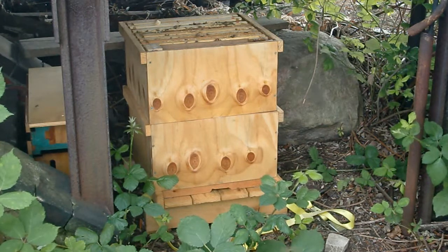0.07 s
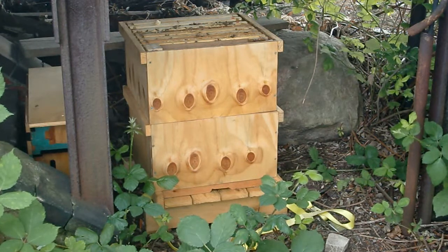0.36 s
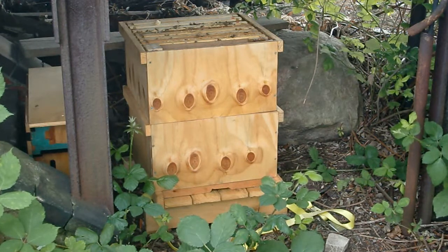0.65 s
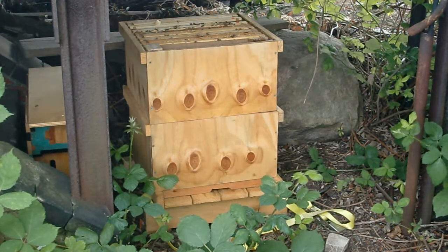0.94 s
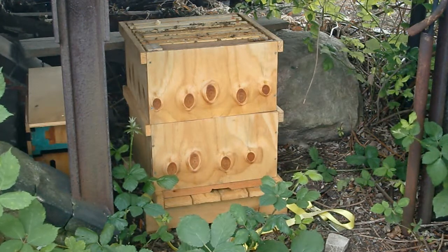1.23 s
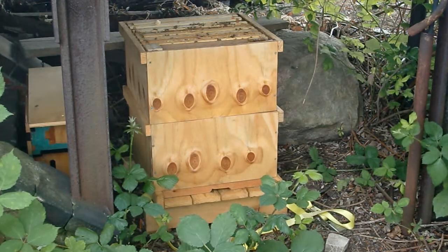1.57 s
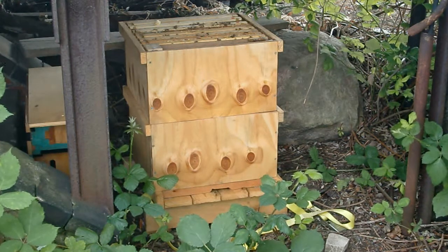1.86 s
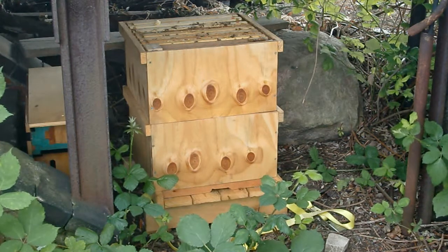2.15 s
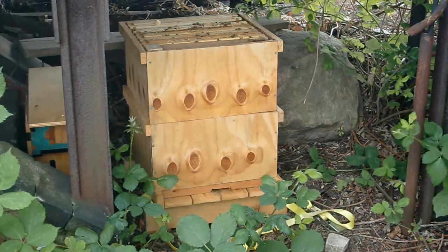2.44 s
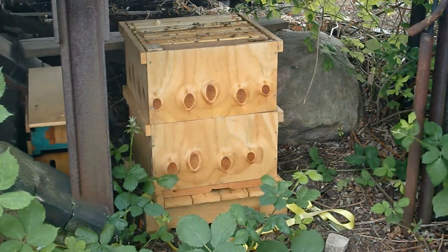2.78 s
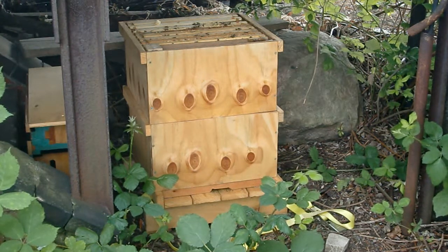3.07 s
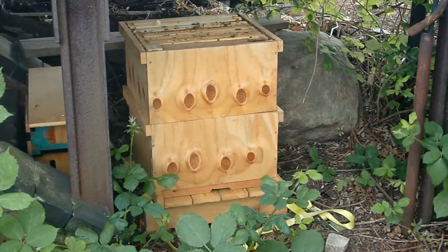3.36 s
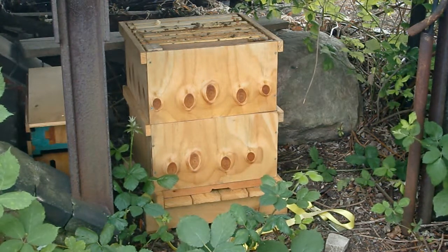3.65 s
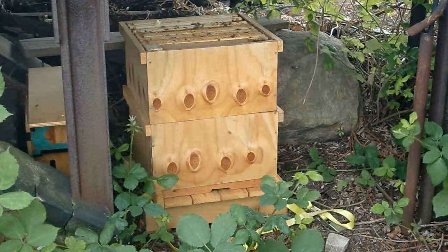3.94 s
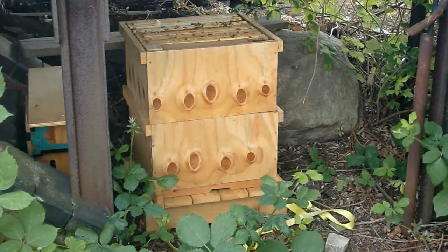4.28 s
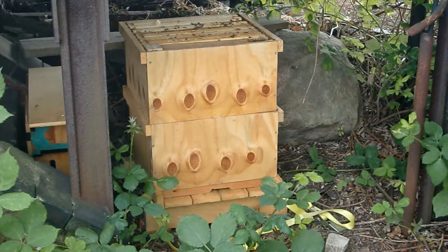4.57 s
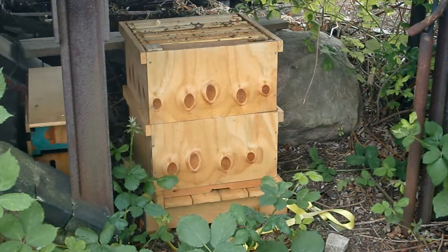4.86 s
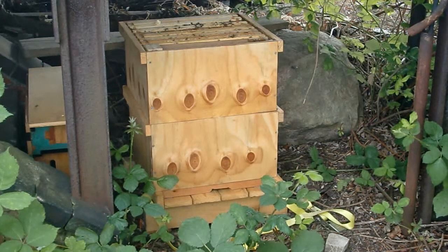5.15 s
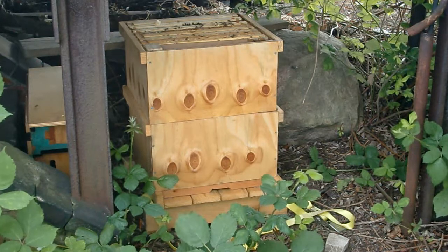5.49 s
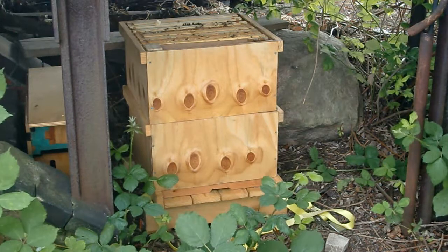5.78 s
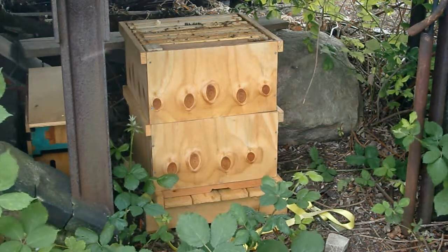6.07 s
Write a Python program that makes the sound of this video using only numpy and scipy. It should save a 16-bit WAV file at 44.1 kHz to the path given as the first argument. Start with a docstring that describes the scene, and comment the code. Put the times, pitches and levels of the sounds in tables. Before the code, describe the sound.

A soft, steady outdoor hiss runs for the whole six seconds beside a beehive, with a low rumble and the faint, wavering drone of distant machinery underneath. Nothing else happens until just before 4 seconds, when a bee's low buzz swells quickly, right up to the microphone. At about 4 seconds the bee hits the camera body with one short, sharp, slightly ringing knock, by far the loudest sound. The hiss ducks for an instant and swells back. At about 4.2 seconds the bee grazes the camera with a much softer, duller tap; its buzz lifts slightly in pitch, then vanishes by about 4.4 seconds as it speeds off. A faint low hum peaks around then and slowly tails away, while the hiss and rumble carry on unchanged to the end.

```python
"""Beside a beehive, a camera stands in a bed of outdoor hiss, low rumble and far machinery drone.
One bee flies in, its wingbeats buzzing, hits the camera body with a sharp, ringing knock,
grazes it once more and speeds off. The knock slams a limiter, so the hiss ducks and swells back.
A faint low hum rises just after the knock and tails away."""
import sys
import numpy as np
from scipy import signal
from scipy.fft import rfft, irfft, next_fast_len
from scipy.io import wavfile
from scipy.ndimage import uniform_filter1d, minimum_filter1d, map_coordinates

SR = 44100
rng = np.random.default_rng(int(sys.argv[2]) if len(sys.argv) > 2 else 0)


def int16_out(signal):
    """Quantize to a 16-bit WAV file."""
    q = np.round(np.clip(np.atleast_2d(signal).T, -1, 1) * 32767)
    wavfile.write(sys.argv[1], SR, q.astype(np.int16))


N = 274302

# colour of the open-air hiss: (frequency [Hz], relative level [dB])
HISS_SPECTRUM = [(59, -41), (100, 0), (447, -2.5), (552, -3.5), (4190, -11.5), (7100, -17), (7730, -21),
                 (8950, -23.5), (15500, -40)]
# colour of the distant rumble: (frequency [Hz], relative level [dB])
RUMBLE_SPECTRUM = [(8, -20), (20, -8), (38, -6), (51, 2.5), (61, -4), (80, -1), (100, -23), (140, -25),
                   (400, -120)]
# harmonics of the buzz: (multiple of the wingbeat [-], relative level [dB])
WING_HARMONICS = [(1, 1.5), (2, -2), (3, -31), (4, -9), (5, -31), (6, -39), (7, -18)]
# the bee's hits on the camera: (time [s], gain [dB], low-pass cutoff [Hz])
CONTACTS = [(4.036, 13, 14500), (4.169, -28.5, 2100)]
# ringing modes of the camera body: (frequency [Hz], relative level [dB], time to fall 60 dB [s])
CAMERA_MODES = [(162, -13.5, 0.017), (267, -6, 0.022), (346, -10, 0.046), (490, -15, 0.071),
                (590, -15.5, 0.046), (773, -6, 0.028), (1110, -16.5, 0.03), (1293, -24.5, 0.037),
                (1555, -15.5, 0.024), (1945, -7.5, 0.01), (2340, -22, 0.012), (2490, -5.5, 0.012),
                (2830, -4, 0.0092), (3230, -5.5, 0.01), (3990, -10, 0.0093), (4700, -14.5, 0.0057),
                (6350, -18, 0.0086), (7170, -13.5, 0.0033), (13100, -26, 0.0015), (3300, -61, 0.18)]

HISS_DB, RUMBLE_DB, DRONE_DB, BUZZ_DB, TAIL_DB = -52.5, -60.5, -62, -42, -61.5  # layer faders
CLOSE_M, APPROACH_M_PER_S, ESCAPE_M_PER_S2 = 0.026, 0.98, 5.3
# wingbeat: an easy hover, and one surge of effort to get clear after the knock
HOVER_HZ, SURGE_HZ, SURGE_PEAK_S, SURGE_WIDTH_S = 186.4, 16.87, 4.168, 0.0764


def amp(db):
    """Decibels to gain."""
    return 10 ** (np.asarray(db) / 20)


def unit(x):
    """Scale to rms 1."""
    return x / np.sqrt(np.mean(x ** 2) + 1e-20)


def wobble(rate):
    """A smooth random modulator, rate knots a second."""
    knots = rng.standard_normal(int(N * rate / SR) + 4)
    return map_coordinates(knots, [np.arange(N) * rate / SR])


def filtered(x, response):
    """EQ x with a gain curve given as a function of frequency."""
    size = next_fast_len(N + SR // 2)
    return irfft(rfft(x, size) * response(np.fft.rfftfreq(size, 1 / SR)), size)[:N]


def noise(spectrum):
    """Noise of rms 1, coloured by (frequency [Hz], level [dB]) points on a log axis."""
    points_hz, db = np.transpose(spectrum)
    colour = lambda hz: amp(np.interp(np.log(hz + 1), np.log(points_hz + 1), db))
    return unit(filtered(rng.standard_normal(N), colour))


def hum(centre_hz, drift, flutter_db):
    """A sine of rms 1 with wandering pitch and optional level flutter."""
    pitch_hz = centre_hz * (1 + drift * wobble(9))
    return unit(amp(flutter_db * wobble(6.7)) * np.sin(2 * np.pi * np.cumsum(pitch_hz) / SR))


def open_air():
    """The ambience bed: even hiss with a narrow treble notch, over a low rumble."""
    notch = lambda hz: amp(-10 * np.exp(-((hz - 7740) / 90) ** 2))
    hiss = amp(HISS_DB + 0.096 * wobble(3.2)) * filtered(noise(HISS_SPECTRUM), notch)
    rumble = amp(RUMBLE_DB + 0.64 * wobble(2.4)) * noise(RUMBLE_SPECTRUM)
    return hiss + rumble


def machinery():
    """Far machinery drones on one low, wavering note."""
    return amp(DRONE_DB) * hum(centre_hz=69, drift=0.0254, flutter_db=2.7)


def bee():
    """Wingbeats make a buzz and puffs of air; effort lifts the pitch, distance rides the level."""
    t = np.arange(N) / SR
    effort = np.exp(-((t - SURGE_PEAK_S) / SURGE_WIDTH_S) ** 2)
    beat_hz = (HOVER_HZ + SURGE_HZ * effort) * (1 + 0.01087 * wobble(90))
    phase = 2 * np.pi * np.cumsum(beat_hz) / SR
    buzz = sum(amp(db + 2.3 * wobble(49)) * np.sin(k * phase) for k, db in WING_HARMONICS)
    stirred_air = noise([(60, -23), (200, -1), (550, -4), (1200, -13), (5000, -48)])
    puffs = amp(-11.5) * (1 + np.cos(phase)) * stirred_air
    # it flies in at a steady speed, stays close between the hits, then accelerates away
    until_hit_s = np.maximum(CONTACTS[0][0] - t, 0)
    since_graze_s = np.maximum(t - CONTACTS[-1][0], 0)
    distance_m = CLOSE_M + APPROACH_M_PER_S * until_hit_s + .5 * ESCAPE_M_PER_S2 * since_graze_s ** 2
    # this near the wings, pressure falls with the square of the distance
    return amp(BUZZ_DB) * (CLOSE_M / distance_m) ** 2 * (buzz + puffs)


def camera_knocks():
    """Each hit gives a tiny crack and rings the camera body, right at the microphone."""
    track = np.zeros(N + SR)
    t = np.arange(SR // 4) / SR
    # neighbouring modes swing opposite ways at the microphone
    ring = sum((-1) ** k * amp(db - 60 * t / t60) * np.sin(2 * np.pi * hz * t)
               for k, (hz, db, t60) in enumerate(CAMERA_MODES))
    for start_s, db, cutoff_hz in CONTACTS:
        crack = amp(-25.0 - 60 * t / 0.013) * rng.standard_normal(len(t))
        # a gentle contact lasts longer and so sounds duller
        lowpass = signal.butter(2, min(cutoff_hz, SR / 3), fs=SR)
        track[round(start_s * SR):][:len(t)] += amp(db) * signal.lfilter(*lowpass, ring + crack)
    return track[:N]


def tail_hum(peak_s=4.36, rise_db_per_s=44, fall_db_per_s=12):
    """A faint low hum swells to a peak just after the knock and fades slowly."""
    t = np.arange(N) / SR - peak_s
    swell = amp(-np.abs(t) * np.where(t < 0, rise_db_per_s, fall_db_per_s))
    return amp(TAIL_DB) * swell * hum(centre_hz=117, drift=0.0173, flutter_db=0.0)


def limiter(x, ceiling_db, release_s):
    """The gain ducks just ahead of a peak over the ceiling, then eases back."""
    over_db = np.maximum(20 * np.log10(np.abs(x) + 1e-9) - ceiling_db, 1e-9)
    release = np.arange(N) / SR / release_s
    # each peak sets a gain cut that then shrinks exponentially
    cut_db = np.exp(np.maximum.accumulate(np.log(over_db) + release) - release)
    lookahead_db = uniform_filter1d(minimum_filter1d(-cut_db, size=89), size=89)
    return x * amp(lookahead_db)


def scene():
    """All layers mixed to mono at one microphone."""
    return (open_air() + machinery() + bee() + camera_knocks() + tail_hum())[None]


def record(dry):
    """The master chain: limiter, hard clip and a steep low-pass at 16 kHz."""
    limited = limiter(dry[0], ceiling_db=-2, release_s=0.044)
    clipped = np.clip(limited, -.7, .7)
    return filtered(clipped, lambda hz: 1 / np.sqrt(1 + (hz / 16000) ** 240))[None]


dry = scene()
out = record(dry)
int16_out(out)
```